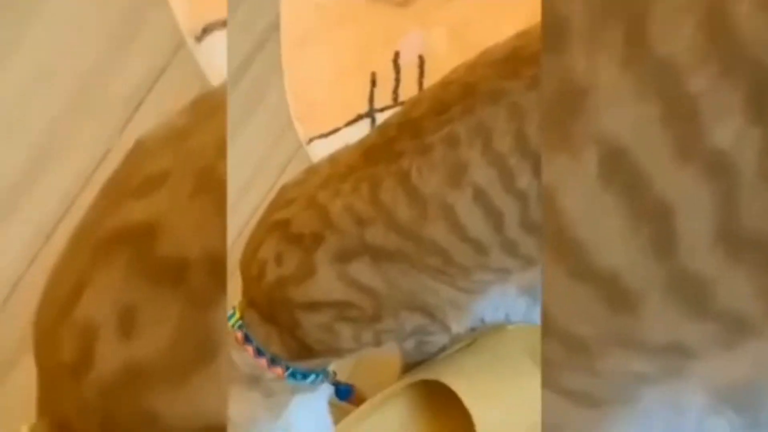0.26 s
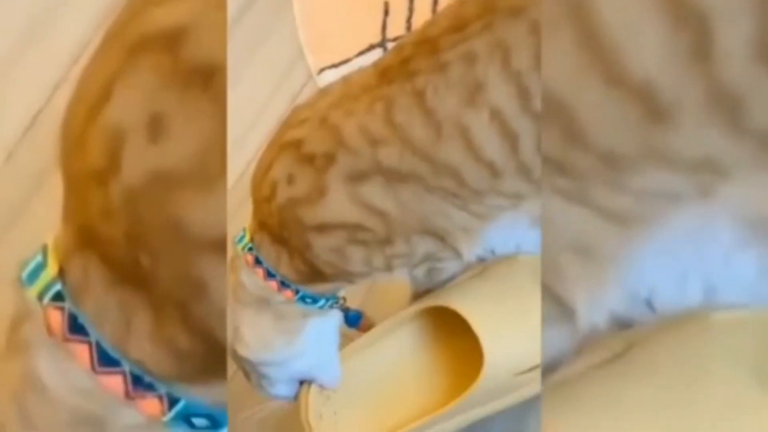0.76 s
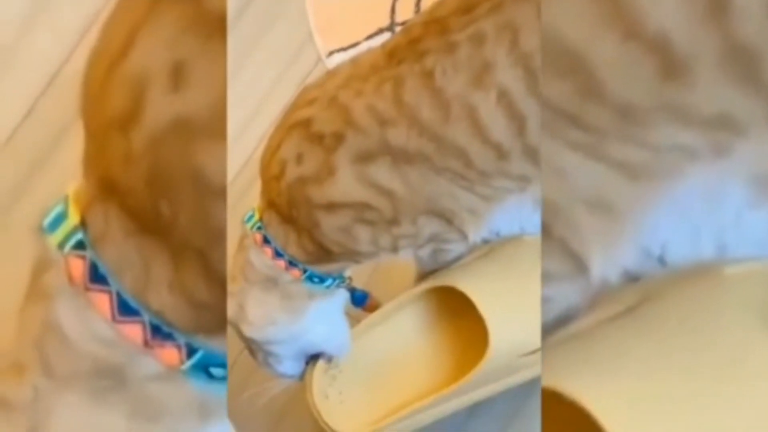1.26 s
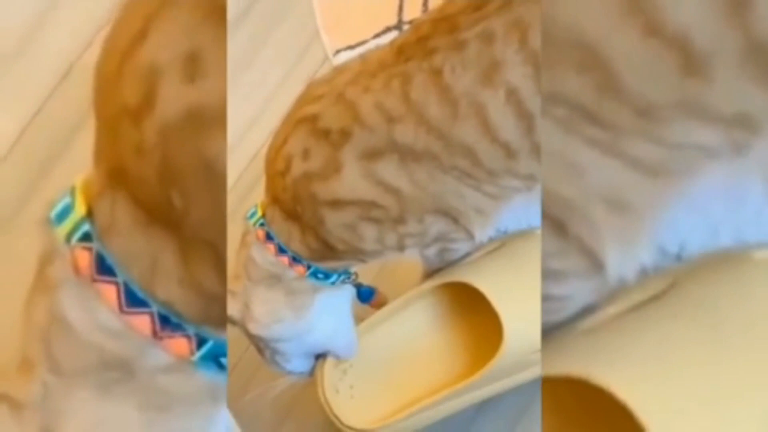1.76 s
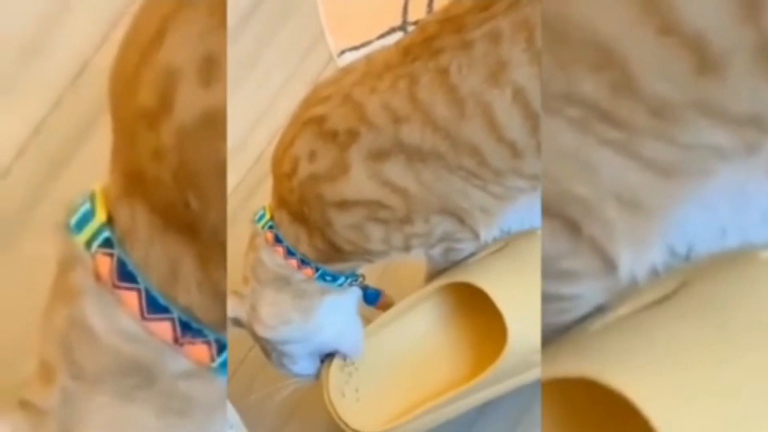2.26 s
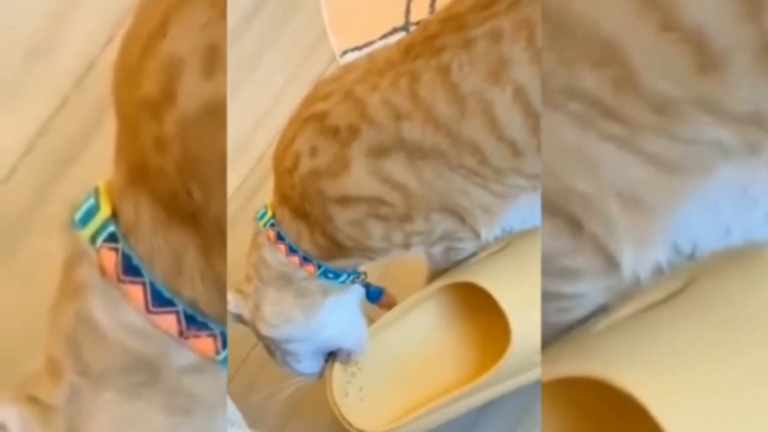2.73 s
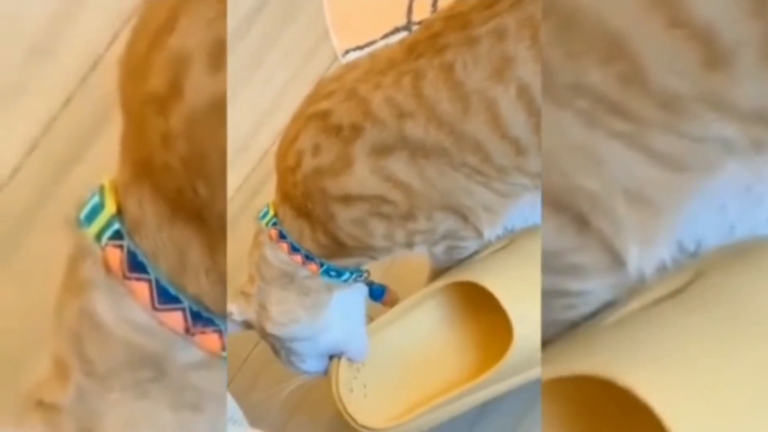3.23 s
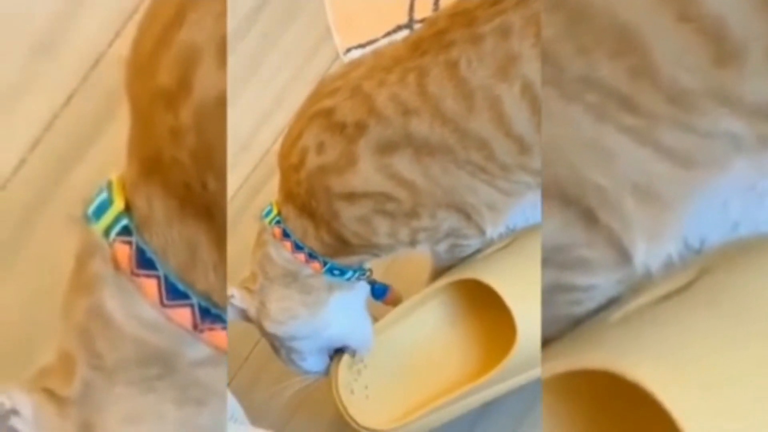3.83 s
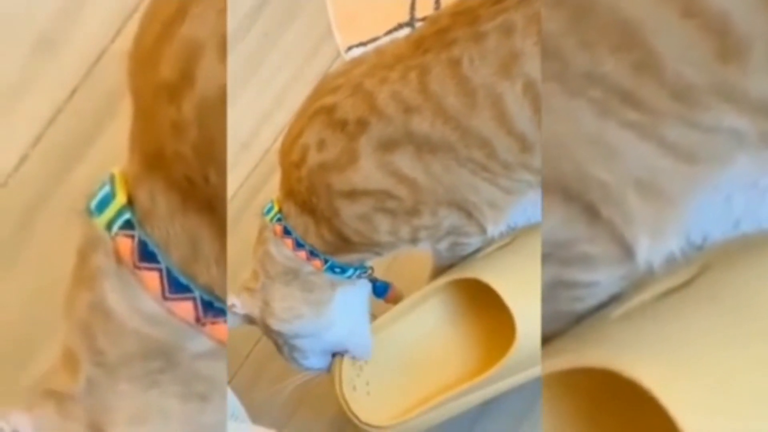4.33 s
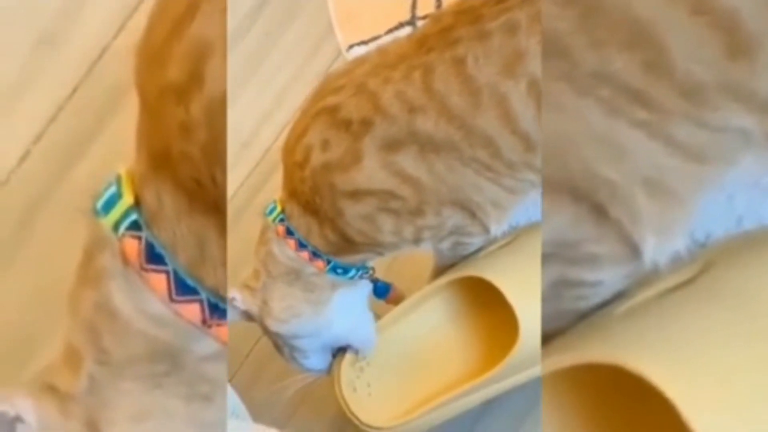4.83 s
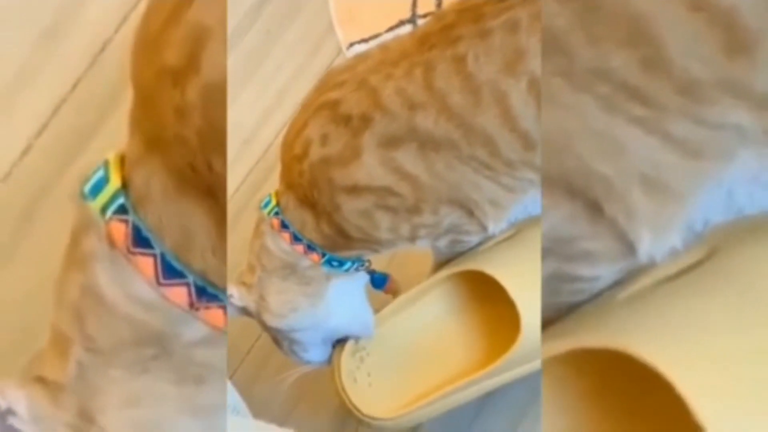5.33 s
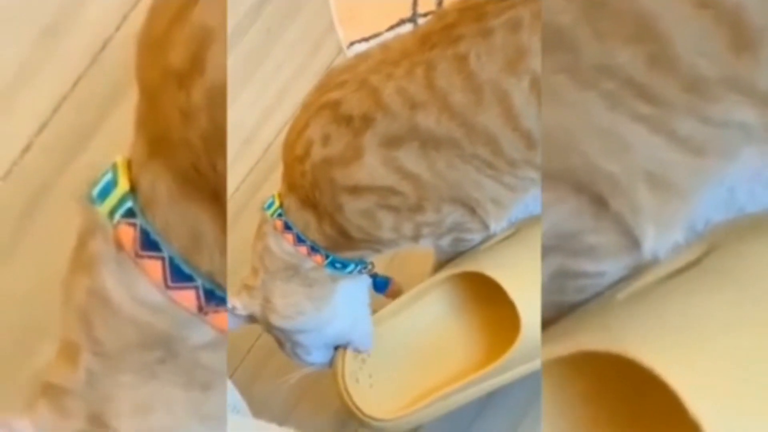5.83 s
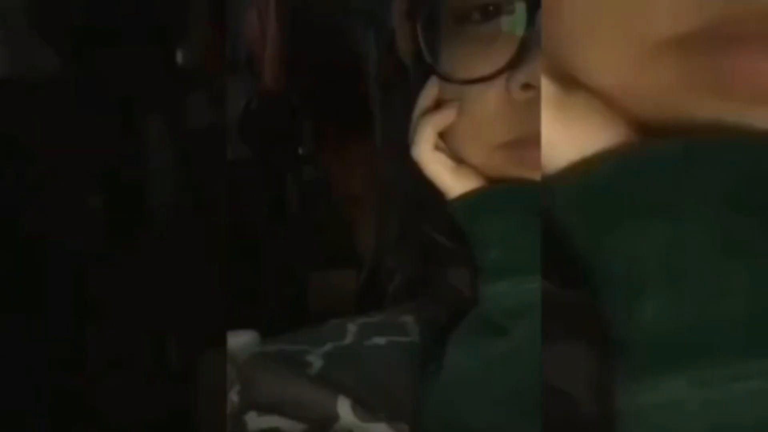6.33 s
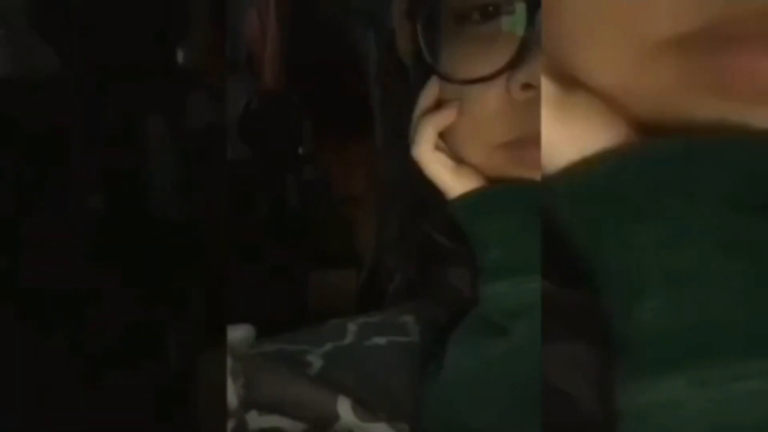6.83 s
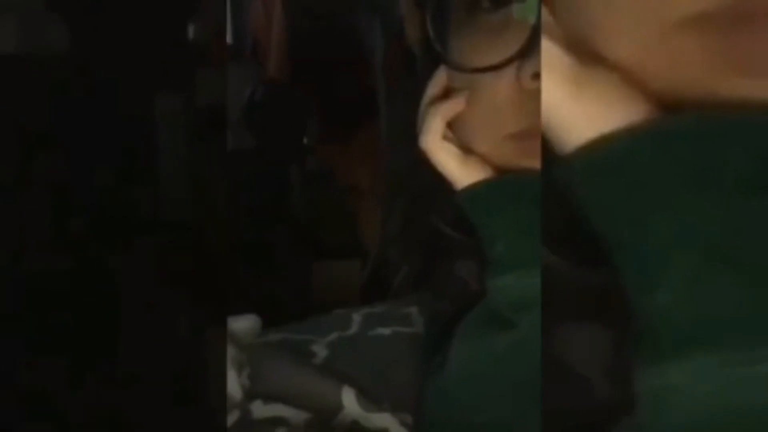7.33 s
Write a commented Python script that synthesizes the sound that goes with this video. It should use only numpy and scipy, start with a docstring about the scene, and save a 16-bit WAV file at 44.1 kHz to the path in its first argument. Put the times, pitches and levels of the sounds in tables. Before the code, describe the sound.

Close wet snorts, snapping clicks and fluttering rasps from a cat biting a plastic slipper, cut abruptly to one arching, nasal kitten meow.

```python
"""Wet clicks, squealing snorts and rattling rasps, close up over a low room rumble, then one arching meow.
A cat gnaws a plastic slipper in six rounds, nose pressed into it: noise bursts, fluttering pulses and
decaying rings all excite the narrow resonances of the hollow slipper. Then, in a quieter room, a kitten
calls once: harmonics of a gliding pitch pass through a mouth that opens and closes."""
import sys
import numpy as np
from scipy import signal
from scipy.fft import rfft, irfft, next_fast_len
from scipy.io import wavfile
from scipy.ndimage import uniform_filter1d, map_coordinates

SR = 44100
rng = np.random.default_rng(int(sys.argv[2]) if len(sys.argv) > 2 else 0)


def bounce(signal):
    """Save signal as a 16-bit WAV file at the path given by the first command-line argument."""
    frames = np.transpose(np.atleast_2d(signal))
    limited = np.clip(frames, -1, 1)
    pcm = np.round(limited * 32767).astype(np.int16)
    wavfile.write(sys.argv[1], SR, pcm)


N = 334278
T = np.arange(N) / SR

# snuffling before each bite; levels are relative:
# (rush peak t/s, flutter level/dB, rush level/dB, flutter build-up/dB per s, rush build-up/dB per s)
SNUFFLES = [(.915, -43, -42.5, 20, 169), (2.151, -34.5, -40, 119, 149), (3.45, -34, -37, 77.5, 151.5),
            (4.644, -42.5, -44, 71, 101), (6.02, -36, -41.5, 89, 201)]
SNUFFLE_LEAD_S = 0.05  # the flutter peaks this far ahead of the rush
# spectrum of air forced through the nose or past a wet seal: (f/Hz, relative level/dB)
BURST_AIR = [(100, -33.5), (350, -26), (600, -15.5), (800, -17), (1100, -9.5), (1900, 0.5), (2900, -4),
             (3900, -2), (5000, -5.5), (7000, -11), (8500, -28), (10000, -8), (11700, -12.5), (15000, -37)]


def undb(db):
    """Decibels to gain."""
    return 10 ** (np.asarray(db) / 20)


def unit(x):
    """Scale to rms 1."""
    return x / np.sqrt(np.mean(x ** 2) + 1e-20)


def noise():
    """White noise for the whole scene."""
    return rng.standard_normal(N)


def band(x, lo_hz, hi_hz):
    """Band-pass."""
    sos = signal.butter(3, [lo_hz, min(hi_hz, .45 * SR)], "band", fs=SR, output="sos")
    return signal.sosfilt(sos, x)


def colour(x, points):
    """Causal minimum-phase filter through (f/Hz, level/dB) points, scaled to rms 1."""
    hz, db = np.transpose(points)
    size = next_fast_len(N + 8192, True) // 2 * 2
    f = np.maximum(np.arange(size // 2 + 1) * SR / size, 1)
    log_gain = np.log(undb(np.interp(np.log(f), np.log(hz), db)))
    # folding the cepstrum onto positive times makes the filter causal
    cepstrum = irfft(log_gain)
    cepstrum[1:size // 2] *= 2
    cepstrum[size // 2 + 1:] = 0
    response = np.exp(rfft(cepstrum))
    return unit(irfft(rfft(x, size) * response)[:N])


def walk(rate):
    """Smooth random drift of rms 1, changing about rate times per second."""
    k = max(int(SR / rate), 2)
    return unit(uniform_filter1d(uniform_filter1d(noise(), k), k))


def envelope(start, hold, rise, fall, sag=0):
    """Gain that climbs to 1 at the start, sags while held, then falls; slopes in dB per s."""
    t = T - start
    return undb(rise * np.minimum(t, 0) - sag * np.clip(t, 0, hold) - fall * np.maximum(t - hold, 0))


def gate(start, fade=0.0016):
    """Gain that opens exponentially up to the start and stays open."""
    return np.exp(np.minimum(T - start, 0) / fade)


def echo(x, t60, lo_hz, hi_hz):
    """The diffuse tail of a room within one band: decaying noise after a 4 ms gap."""
    t = T[:SR]
    tail = band(noise()[:SR], lo_hz, hi_hz) * undb(-60 * t / t60) * (t > .004)
    return signal.fftconvolve(x, tail / np.linalg.norm(tail))[:N]


def first_room_rumble():
    """Steady, bass-heavy room noise under the gnawing, drifting slightly in level."""
    # spectrum of the first room: (f/Hz, relative level/dB)
    room_spectrum = [(15, -40.5), (25, -16), (75, 3.5), (154, -7), (207, -6), (879, -28.5), (1180, -26.5),
                     (1960, -30.5), (2930, -28.5), (3540, -34.5), (3830, -27.5), (5010, -40.5),
                     (10000, -30.5), (11800, -31), (15000, -70.5)]
    return colour(noise(), room_spectrum) * undb(-51 + 1.1 * walk(11))


def second_room_hush():
    """Quieter room noise under the meow, which comes up as the call ends."""
    # spectrum of the second room: (f/Hz, relative level/dB)
    room_spectrum = [(25, -19), (58, 3.5), (130, -2.5), (250, -7.5), (500, -19), (1000, -21.5),
                     (2000, -31.5), (4000, -33.5), (8000, -43.5), (15000, -47.5)]
    rise_start_s, rise_length_s, rise_db = 6.99, 0.22, 4.5
    rise = np.clip((T - rise_start_s) / rise_length_s, 0, 1)
    return colour(noise(), room_spectrum) * undb(-63.5 + rise_db * rise + walk(9))


def buffeting():
    """The strongest gusts of air buffet the microphone as bursts of low noise."""
    # gusts: (start t/s, length/s, level/dB)
    gust_table = [(0.035, 0.19, -47), (2.096, .22, -48), (5.788, 0.024, -47), (5.99, 0.1, -40)]
    slope = 251  # dB per s, both up and down
    gusts = sum(undb(db) * envelope(s, length, slope, slope) for s, length, db in gust_table)
    return unit(band(noise(), 37, 130)) * gusts


def puffs(bursts):
    """Each snort puffs softly against the microphone: low noise follows its smoothed strength."""
    strength = uniform_filter1d(np.abs(bursts), size=2500)
    return unit(band(noise(), 50, 220)) * strength * undb(-23.5)


def whistles():
    """Air whistles thinly through the nose: faint, slightly wavering sine tones."""
    # whistles: (middle t/s, half length/s, f/Hz, level/dB)
    whistle_table = [(2.878, 0.015, 3000, -56), (2.905, 0.028, 3760, -67.5), (3.012, .022, 3830, -52),
                     (5.68, 0.027, 3720, -61)]
    wobble = np.cumsum(1 + 0.006 * walk(100)) / SR
    out = np.zeros(N)
    for s, half, hz, db in whistle_table:
        swell = np.exp(-((T - s) / half) ** 2)
        out += undb(db) * swell * np.sin(2 * np.pi * hz * wobble)
    return out


def flutter(rate, jitter, scatter_db):
    """Soft tissue slaps shut at uneven intervals, about rate times per second, with uneven force."""
    chance = rng.uniform(-1, 1, (3000, 2))
    at = (np.cumsum(np.exp(jitter * chance[:, 0])) * SR / rate).astype(int)
    pulses = np.zeros(N)
    pulses[at[at < N]] = undb(scatter_db * chance[at < N, 1])
    return pulses


def air(points, grain_db):
    """Turbulent air: coloured noise made grainy by saliva."""
    return colour(noise() * undb(grain_db * walk(900)), points)


def cavity_rattle(pulses, cavity, leak_db):
    """Fluttering tissue and the air leaking past it ring a cavity."""
    return colour(unit(pulses) + undb(leak_db) * noise(), cavity)


def uneven_rush(points):
    """Grainy air whose flow wobbles in strength."""
    rush = air(points, grain_db=1.5)
    # the level of the rush is set by its treble
    rush = rush / np.std(band(rush, 4500, 7500))
    return rush * undb(1.5 * walk(50))


def sinking(x):
    """The nose's resonance glides down around each snuffle's peak, as playback speed slows."""
    sink_octaves, sink_s = .13, .09  # sinks from this far above to this far below
    peaks = np.array(SNUFFLES)[:, 0] - SNUFFLE_LEAD_S
    nearest = np.abs(T - peaks[:, None]).argmin(axis=0)
    since = T - peaks[nearest]
    speed = 2 ** (-sink_octaves * np.tanh((since + .03) / sink_s))
    return map_coordinates(x, [np.cumsum(speed)], mode="mirror")


def snuffle_flow():
    """Gains of flutter and rush: the throat starts to flutter, then the air swells and ebbs."""
    hold_s, longest_s = 0.029, 0.21
    flutter_fall, rush_fall = 94, 138  # dB per s
    rattle = rush = 0
    for s, flutter_db, air_db, build, swell in SNUFFLES:
        peak = s - SNUFFLE_LEAD_S
        shape = envelope(peak, hold_s, build, flutter_fall)
        # the flutter fades in softly rather than building up from far ahead
        rattle += undb(flutter_db) * shape * gate(peak - longest_s, fade=0.045)
        rush += undb(air_db) * envelope(s, hold_s, swell, rush_fall)
    return rattle, rush


def snuffling():
    """Before a bite, the throat's flutter rings the nose while air rushes through it."""
    # spectrum of the rushing air: (f/Hz, relative level/dB)
    air_spectrum = [(120, -41), (200, -15), (602, -14.5), (775, -19), (1070, -12.5), (1510, -6.5),
                    (1910, -15), (2650, -3.5), (3230, -9), (5550, -14.5), (7150, -19), (8570, -52),
                    (9720, -12), (11600, -18), (15000, -55.5)]
    # resonances of the nose before their glide: (f/Hz, relative level/dB)
    nose_spectrum = [(200, -17), (800, -11.5), (1350, -16.5), (1750, 3.5), (2050, -9.5), (2400, -10),
                     (2800, -9.5), (4000, -39.5), (14000, -55)]
    rattle_gain, rush_gain = snuffle_flow()
    rattle = sinking(cavity_rattle(flutter(160, 0.23, 2.7), nose_spectrum, leak_db=3.5))
    rush = uneven_rush(air_spectrum)
    return undb(-1.0) * rattle * rattle_gain + undb(-2.0) * rush * rush_gain


def rasp_flow():
    """Gains of flutter and rush: the air starts at full force and ebbs; the flutter holds, then stalls."""
    # rasps, levels relative:
    # (start t/s, rush level/dB, delay of full flutter/s, flutter length/s, flutter level/dB)
    rasp_table = [(0.067, -33.5, .11, 0.014, -29.5), (1.133, -32.5, 0.099, 0.048, -30),
                  (2.388, -33.5, .01, 0.26, -22), (3.692, -35.5, .005, 0.32, -22.5),
                  (4.839, -35, 0.0064, 0.19, -22.5)]
    rush_ebb, flutter_rise, flutter_sag, flutter_stall = 111, 124.5, 71.5, 203  # dB per s
    rattle = rush = 0
    for s, air_db, delay, length, flutter_db in rasp_table:
        shape = envelope(s + delay, length, flutter_rise, flutter_stall, flutter_sag)
        rattle += undb(flutter_db) * gate(s) * shape
        rush += undb(air_db) * gate(s) * envelope(s, 0, 0, rush_ebb)
    return rattle, rush


def rasping():
    """A rattling rasp: slower flutter rings the throat under an ebbing rush of air."""
    # spectrum of the rushing air: (f/Hz, relative level/dB)
    air_spectrum = [(120, -35), (200, -14), (602, -11.5), (789, -6), (1110, -11), (2060, -2), (2380, -10.5),
                    (3800, -10), (6770, -19), (8120, -42), (8570, -54.5), (9380, -22), (10100, -14),
                    (13000, -33), (15000, -68.5)]
    # resonances of the throat: (f/Hz, relative level/dB)
    throat_spectrum = [(200, -24), (600, -22.5), (790, -16.5), (1100, -25.5), (1600, -7), (2050, 7.5),
                       (2450, -5), (2850, -0.5), (3600, -20), (6000, -59), (14000, -70)]
    rattle_gain, rush_gain = rasp_flow()
    rattle = cavity_rattle(flutter(104, .2, 4.3), throat_spectrum, leak_db=-5)
    rush = uneven_rush(air_spectrum)
    return undb(-3.5) * rattle * rattle_gain + undb(-0.5) * rush * rush_gain


def huff():
    """The last round ends in one long push of air through the open mouth."""
    # the huff: (start t/s, length/s, relative level/dB)
    huff_row = (5.785, 0.31, -27)
    # spectrum of the breath: (f/Hz, relative level/dB)
    breath_spectrum = [(29, -75), (50, 0.5), (77, -5.5), (150, -8.5), (518, -2.5), (658, -4), (797, -7),
                       (987, -6.5), (1410, -1.5), (2070, -1), (3850, -5.5), (8460, -18.5), (10200, -12),
                       (11800, -17), (15000, -55.5)]
    s, length, db = huff_row
    shape = gate(s) * envelope(s, length, 0, fall=203, sag=29.5)
    return air(breath_spectrum, grain_db=2.5) * shape * undb(db + walk(180))


def squeaks():
    """A narrow wet gap whistles downward as it widens; the mouth picks out the overtones."""
    # squeaks, levels relative: (start t/s, length/s, first f/Hz, last f/Hz, level/dB, overtone level/dB)
    squeak_table = [(3.183, 0.026, 1184, 658, -39, 3), (4.359, 0.045, 2083, 690, -34.5, 6),
                    (5.716, 0.027, 2240, 1752, -24, -18), (5.742, 0.026, 2090, 1705, -18.5, -12.5)]
    mouth_hz, mouth_width = 2700, 0.72  # width in natural-log frequency
    out, wobble = np.zeros(N), 1 + 0.037 * walk(600)
    for s, length, first_hz, last_hz, db, overtones_db in squeak_table:
        near = (T > s) & (T < s + length)
        u = (T[near] - s) / length
        hz = first_hz * (last_hz / first_hz) ** (u ** .7) * wobble[near]
        phase = 2 * np.pi * np.cumsum(hz) / SR
        overtones = 0
        for k in range(2, 7):
            detune = np.log(k * hz / mouth_hz) * 2 / mouth_width
            overtones = overtones + np.sin(k * phase) / (1 + detune ** 2)
        # an extra push three quarters of the way through
        push = np.sqrt(np.sin(np.pi * u)) * (0.47 + np.exp(-((u - .75) / 0.051) ** 2))
        out[near] += undb(db) * push * (np.sin(phase) + undb(overtones_db) * overtones)
    return out


def snorts():
    """Air bursts through the pinched nose, which squeals briefly; the chest adds weight."""
    # snorts and sniffs, levels relative:
    # (peak t/s, rise/s, fall/s, air level/dB, squeal f/Hz, squeal level/dB, chest level/dB)
    snort_table = [(.033, 0.018, 0.013, -19.5, 2150, -29, -51.5),
                   (0.043, 0.0058, .013, -14.5, 2086, -10, -38),
                   (1.111, 0.018, 0.017, -13.5, 1990, -37.5, -40.5),
                   (1.791, 0.014, 0.02, -45, 2780, -46.5, -57),
                   (2.074, 0.0043, 0.022, -22.5, 1720, -11.5, -40),
                   (2.084, 0.0042, 0.0086, -37, 1616, -16, -31),
                   (2.113, 0.0008, 0.0036, -16, 1600, -7, -21.5),
                   (2.356, 0.0061, 0.01, -18, 1880, -32.5, -55),
                   (2.364, 0.0047, 0.025, -18, 1870, -26, -48.5),
                   (2.398, 0.0068, 0.031, -33, 1844, -22.5, -37.5),
                   (3.101, 0.017, 0.014, -43.5, 1880, -45.5, -55),
                   (3.21, 0.0051, 0.029, -45.5, 1890, -48.5, -50),
                   (3.36, 0.0044, 0.016, -27.5, 1830, -23.5, -37),
                   (3.37, 0.003, 0.0017, -50, 1754, -13.5, -49),
                   (3.425, 0.0023, .006, -17, 1566, -8.5, -29.5),
                   (3.655, 0.01, 0.03, -16.5, 2000, -17, -52),
                   (3.671, 0.0047, 0.008, -34.5, 2084, -11.5, -33),
                   (4.31, 0.0076, 0.0071, -59.5, 2300, -53, -66),
                   (4.395, .02, 0.074, -46.5, 1800, -53.5, -55.5),
                   (4.511, 0.0029, 0.025, -29, 1650, -23, -38),
                   (4.571, .002, 0.014, -23.5, 1650, -18.5, -34.5),
                   (4.581, 0.0031, 0.0066, -30, 1627, -17, -46),
                   (4.812, 0.016, 0.03, -18, 2080, -10.5, -36.5),
                   (4.827, 0.0056, 0.0078, -41.5, 3860, -15, -39),
                   (5.564, 0.014, 0.023, -46, 1906, -48, -52.5), (5.74, 0.02, 0.089, -31.5, 1854, -43, -49),
                   (5.776, 0.0053, 0.014, -15, 1800, -44.5, -19.5),
                   (6.007, 0.0037, 0.0091, -16, 1446, -19, -24.5)]
    rush = air(BURST_AIR, grain_db=1.5)
    wobble = np.cumsum(1 + .07 * walk(700)) / SR
    shake = undb(1.1 * walk(400))
    chest = unit(band(noise(), 310, 920))
    out = np.zeros(N)
    for s, rise, fall, air_db, hz, squeal_db, chest_db in snort_table:
        near = np.abs(T - s) < .15
        t, phase = T[near] - s, 2 * np.pi * hz * wobble[near]
        shape = np.exp(-np.where(t < 0, (t / rise) ** 2, t / fall))
        tone = np.sin(phase) + undb(-17) * np.sin(2 * phase)
        # the squeal needs a strong flow, so it dies away before the air does
        squeal = np.sqrt(2 * shape) * shake[near] * tone
        burst = undb(air_db) * rush[near] + undb(squeal_db) * squeal + undb(chest_db) * chest[near]
        out[near] += shape * burst
    return out


def clicks():
    """A wet seal of tongue and teeth snaps open; its pocket rings and drops in pitch, the jaw knocks."""
    # clicks, levels relative: (t/s, level/dB, settled ring f/Hz, snap level/dB)
    click_table = [(0.57, -27.5, 2080, -3), (0.59, -38.5, 2060, 13.5), (0.6681, -5.5, 2090, -4.5),
                   (.778, -34, 2000, 8.5), (.8626, -3.5, 1670, 1), (1.864, -24, 1740, -13),
                   (2.1904, -21.5, 2510, 14), (3.1877, -19, 2270, 0.5), (3.385, -18.5, 1720, 7.5),
                   (3.402, -18, 1650, 5.5), (3.478, -15, 1500, 3), (4.5402, -16, 1640, 3),
                   (4.569, -3, 1625, -4), (4.627, -15.5, 2290, 0.5), (4.646, -9, 2520, 3.5),
                   (5.6298, -22, 1640, -13), (5.9262, -10, 1590, -1), (5.9418, -12.5, 1550, -3),
                   (5.954, -18, 1475, -1), (5.969, -24, 1500, 8), (5.9835, -15.5, 1430, 8.5),
                   (6.0621, -11.5, 2470, 4), (6.1825, -32, 1795, -14)]
    out, t, hiss = np.zeros(N), np.arange(2000) / SR, colour(noise(), BURST_AIR)
    knock = undb(-14) * np.sin(2 * np.pi * 750 * t) * np.exp(-t / 0.0013)
    onset = 1 - np.exp(-t / 0.00046)
    for s, db, hz, treble_db in click_table:
        at = int(s * SR) + np.arange(len(t))
        ring_hz = hz * (1 + .3 * np.exp(-t / 0.001))
        ring = np.sin(2 * np.pi * np.cumsum(ring_hz) / SR) * np.exp(-t / .002)
        snap = hiss[at] * np.exp(-t / .0014)
        snap = snap / np.abs(snap).max() * undb(treble_db - 2)
        out[at] += undb(db) * (undb(-1) * ring + snap + knock) * onset
    return out


def slipper(x):
    """The hollow slipper is rung by every sound made into it: narrow resonances join the direct sound."""
    # resonances: (f/Hz, width/Hz, level over the direct sound/dB)
    resonances = [(789.3, 29, 2), (913, 25, -4), (1257, 25, -4), (1510, 25, -10.5), (1690, 8.3, -11),
                  (1910, 5.9, -4), (2250, 35, -12), (2486, 11, -7), (3400, 4.1, -9), (3810, 14, -2.5),
                  (3720, 50, -0.5), (4140, 55, -3.5)]
    out = x
    for hz, width, db in resonances:
        b, a = signal.iirpeak(hz, hz / width, fs=SR)
        out = out + undb(db) * signal.lfilter(b, a, x)
    return out


def hoarseness(t):
    """Noise share at 2 kHz: the voice starts rough, clears, and briefly roughens again."""
    # rough moments: (middle t/s, half length/s, hoarseness level/dB)
    crack_table = [(6.765, .022, -15), (7.035, .035, -7)]
    onset_db, clear_db, rough_until_s, clearing_db_per_s = -18, -30, 6.48, 70
    base_db = np.clip(onset_db - clearing_db_per_s * (t - rough_until_s), clear_db, onset_db)
    return undb(base_db) + sum(undb(db) * np.exp(-((t - s) / half) ** 2) for s, half, db in crack_table)


def meow():
    """Harmonics through a mouth that opens and closes; at the top the folds beat strong-weak."""
    # pitch before smoothing and tremble: (t/s, f/Hz)
    pitch_table = [(6.29, 313.3), (6.36, 382.7), (6.38, 386), (6.45, 468), (6.55, 501), (6.71, 476.4),
                   (6.906, 376.5), (6.976, 361), (7.008, 345), (7.02, 322.2), (7.04, 335), (7.06, 310)]
    # opening of the mouth: (t/s, main resonance f/Hz)
    mouth_table = [(6.28, 750), (6.37, 1020), (6.425, 1754), (6.52, 2160), (6.76, 1846), (6.84, 1910),
                   (6.9, 1720), (6.96, 1460), (7.01, 1160), (7.1, 935)]
    # voice colour: (multiple of the main resonance, relative level/dB)
    voice_table = [(.3, -13), (.5, -6.5), (.72, -9), (.9, 4.5), (1, 5), (1.25, -7), (1.5, -14.5),
                   (1.8, -23.5), (2.4, -33), (2.8, -42), (3.3, -46), (4, -72)]
    # fixed upper resonances of the head: (f/Hz, relative level/dB)
    head_table = [(3200, 0), (3900, -4), (4300, -8), (4900, -4), (5450, 1), (5900, -4), (6400, -18),
                  (7000, -34), (10000, -45)]
    # a fixed resonance lifts the harmonics that pass it: (f/Hz, width/Hz, gain level/dB)
    lift_row = (2600, 300, 3)
    # the push in the middle of the call: (start t/s, length/s, gain level/dB)
    push_row = (6.607, 0.22, 6.5)
    lift_hz, lift_width_hz, lift_db = lift_row
    push_s, push_length, push_db = push_row
    s, pitch = np.transpose(pitch_table)
    near = (T > s[0] - .1) & (T < s[-1] + .1)

    tremble = 1 + .0018 * walk(120)
    hz = (uniform_filter1d(np.interp(T, s, pitch), size=1200) * tremble)[near]
    phase = 2 * np.pi * np.cumsum(hz) / SR
    mouth = np.interp(T[near], *np.transpose(mouth_table))
    k = np.arange(2, 22)[:, None]  # harmonic numbers above the fundamental
    # hoarseness blurs each harmonic on its own, the high ones most
    lowpass = signal.butter(2, 170, fs=SR, output="sos")
    blur = signal.sosfilt(lowpass, rng.standard_normal((2, len(k), len(hz))))
    upper = np.clip((k * hz - 3200) / 800, 0, 1)  # crossfade from mouth to head
    hoarse = hoarseness(T[near]) * k * hz / 2000 + .22 * upper
    partials = (1 + hoarse * unit(blur[0])) * np.sin(k * phase) + hoarse * unit(blur[1]) * np.cos(k * phase)
    partials = partials / np.sqrt(1 + 2 * hoarse ** 2)

    oral = (1 - upper) * undb(np.interp(k * hz / mouth, *np.transpose(voice_table)))
    oral = oral * undb(lift_db * np.exp(-((k * hz - lift_hz) / lift_width_hz) ** 2))
    head = upper * undb(np.interp(k * hz, *np.transpose(head_table)))

    push = envelope(push_s, push_length, rise=112, fall=135.5)[near]
    voicing = envelope(s[0] + 0.024, s[-1] - s[0], rise=400, fall=400)[near]
    # the lips part quickly and close more slowly; some voice leaks out while they are shut
    lips_open_s, lips_close_s = 6.385, 7.03
    lips = envelope(lips_open_s, lips_close_s - lips_open_s, rise=597, fall=263.5)[near]
    lips = np.maximum(lips, undb(-14) * voicing)
    # the call is 10 dB louder per octave of mouth resonance
    loudness = undb(-40.5 + 10 * np.log2(mouth / 2000) + push_db * push)
    head_gain = undb(-61) * push  # the upper overtones sound with the push
    # the fundamental hums through the nose even while the lips are shut
    hum = undb(-60) * voicing

    voice = np.zeros(N)
    voice[near] = np.sqrt(2) * hum * np.sin(phase)
    for weights, gain in ((oral, loudness), (head, head_gain)):
        level = np.sqrt(np.sum(weights ** 2, axis=0) / 2)
        voice[near] += lips * gain * np.sum(weights * partials, axis=0) / level
    # strong-weak beating at half the pitch
    strain = np.clip((hz - 460) / 40, 0, 1)
    voice[near] *= 1 + 2 * undb(-29) * strain * np.sin(phase / 2)
    return voice


def scene():
    """The gnawing cat in one room, then an abrupt change to the kitten in another."""
    bursts = snorts()
    cat = slipper(snuffling() + rasping() + huff() + squeaks() + bursts + clicks()) * undb(-0.5)
    # the first room is small and dry
    cat = cat + undb(-18) * echo(cat, t60=.12, lo_hz=272, hi_hz=4940)
    first_room = cat + buffeting() + puffs(bursts) + whistles() + first_room_rumble()

    call = meow()
    # the low notes of the call linger in the room
    short_tail = undb(-23.5) * echo(call, t60=0.29, lo_hz=700, hi_hz=4000)
    low_tail = undb(-25.5) * echo(call, t60=1.4, lo_hz=241.2, hi_hz=394)
    kitten = call + short_tail + low_tail

    change_s, crossfade_s = 6.2, 0.03  # the crossfade ends at the change
    first = np.clip((change_s - T) / crossfade_s, 0, 1)
    return (first * first_room + (1 - first) * second_room_hush() + kitten)[None]


def record(dry):
    """Soft saturation rounds the loudest peaks, then a steep low-pass cuts the top."""
    ceiling, top_hz = 0.53, 15800
    rounded = ceiling * np.tanh(dry / ceiling)
    return signal.sosfilt(signal.ellip(8, .2, 70, top_hz, fs=SR, output="sos"), rounded)


dry = scene()
out = record(dry)
bounce(out)
```